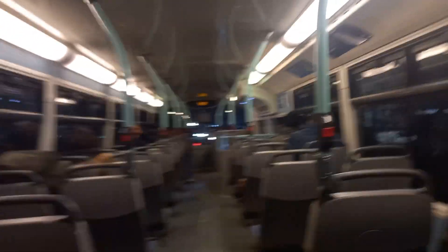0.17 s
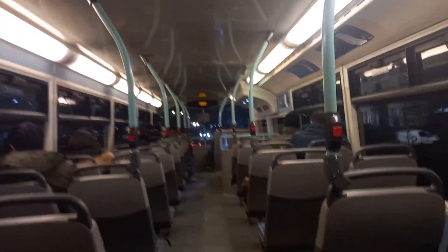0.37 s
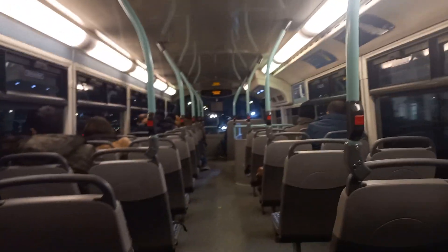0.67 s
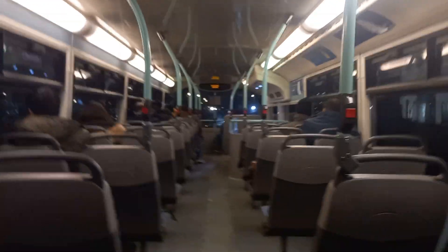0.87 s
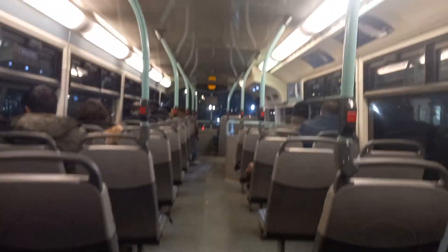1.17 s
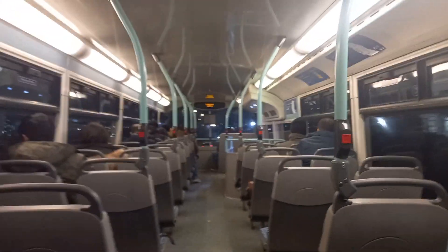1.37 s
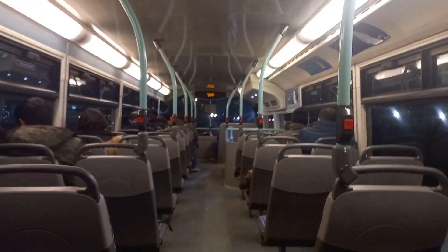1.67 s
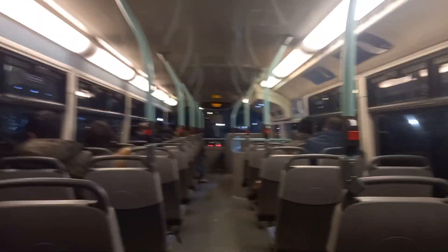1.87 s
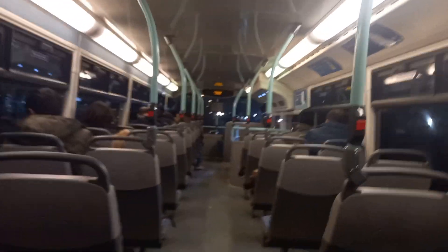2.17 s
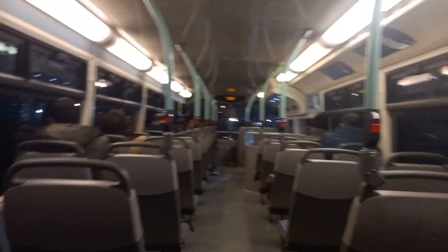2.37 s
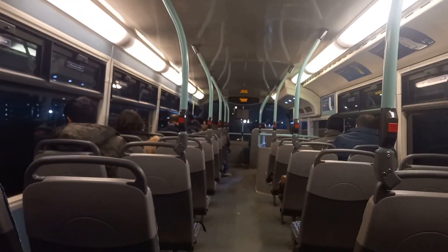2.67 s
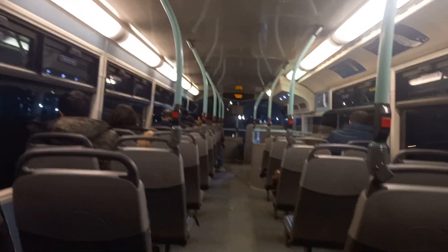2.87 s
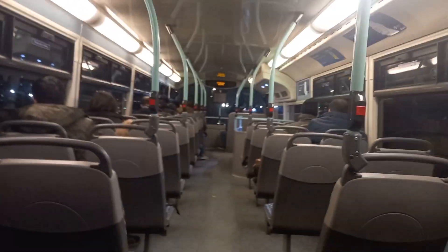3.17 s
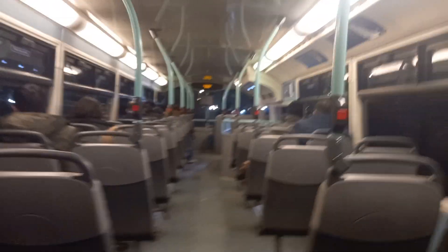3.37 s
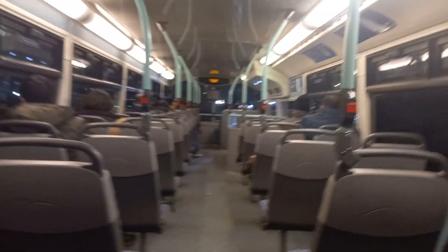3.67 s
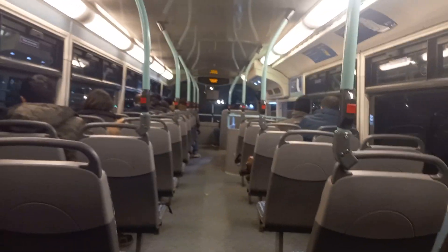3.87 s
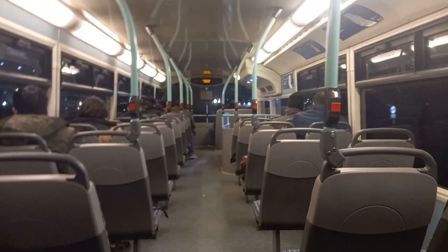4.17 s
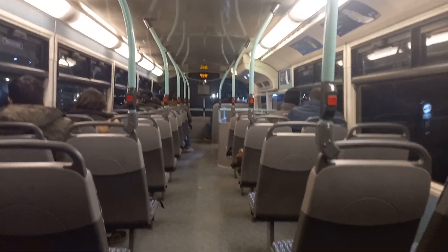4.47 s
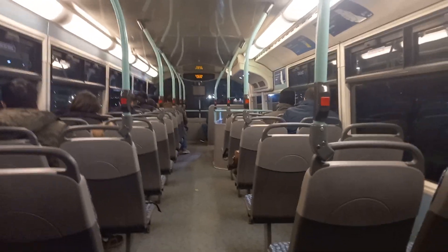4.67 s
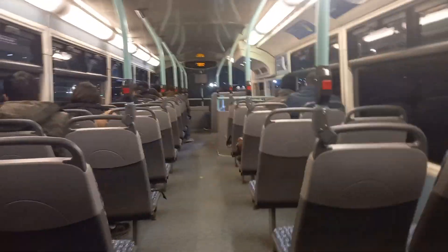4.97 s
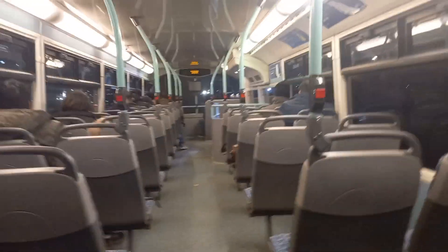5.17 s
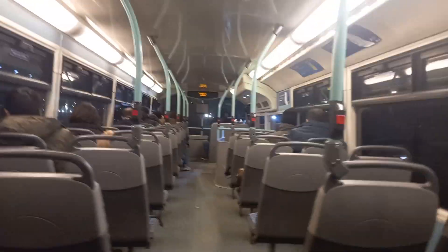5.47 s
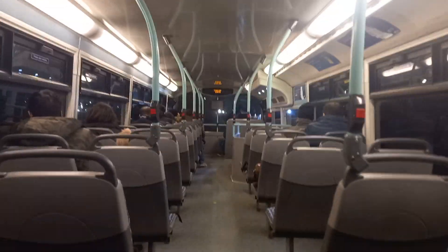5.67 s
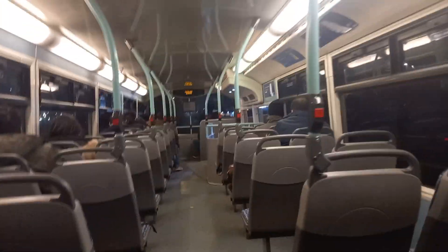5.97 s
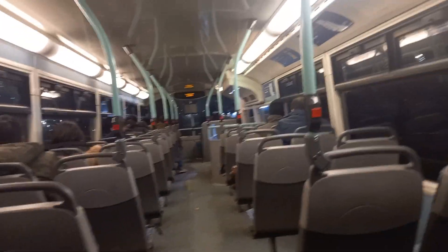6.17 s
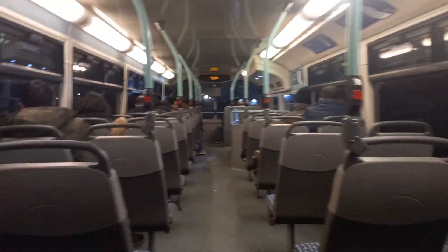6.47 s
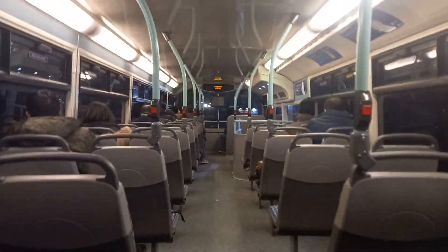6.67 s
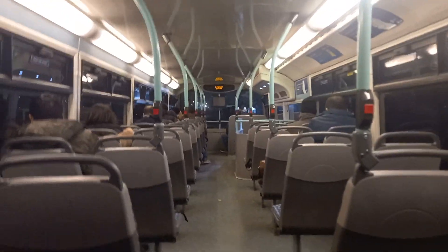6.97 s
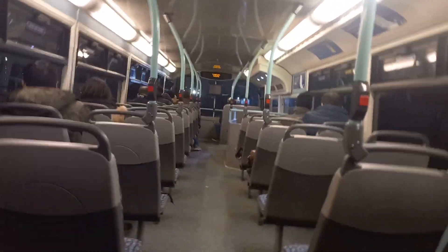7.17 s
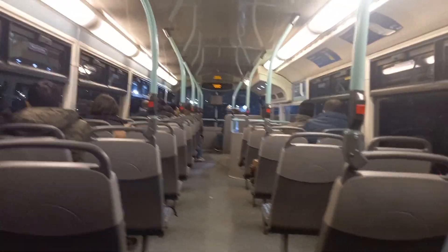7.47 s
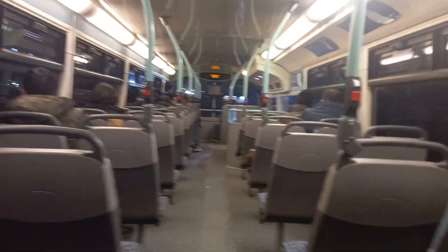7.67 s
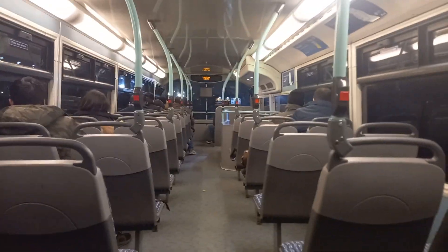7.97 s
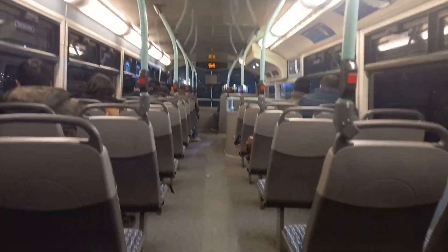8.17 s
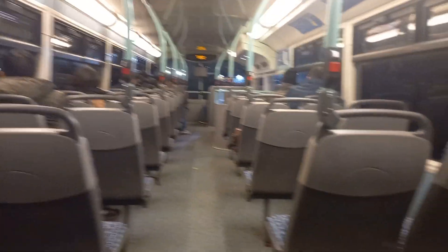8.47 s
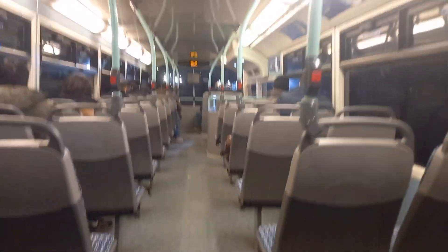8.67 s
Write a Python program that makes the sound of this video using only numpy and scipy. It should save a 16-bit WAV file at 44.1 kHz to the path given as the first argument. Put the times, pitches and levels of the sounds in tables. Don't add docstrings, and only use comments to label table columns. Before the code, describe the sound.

Deep diesel bus engine drone booming through the cabin, easing, shuddering and sagging in pitch, with rattling trim, tyre rumble and soft hiss.

```python
import sys
import numpy as np
from scipy import signal
from scipy.fft import rfft, irfft
from scipy.io import wavfile
from scipy.ndimage import uniform_filter1d

SR = 44100
rng = np.random.default_rng(int(sys.argv[2]) if len(sys.argv) > 2 else 0)


def boost(x):
    u = np.asarray(x, float) / 20
    return 10 ** u


def inscribe(sig):
    pcm = np.round(np.clip(np.atleast_2d(sig).T, -1, 1) * 32767)
    wavfile.write(sys.argv[1], SR, pcm.astype(np.int16))


N = 388080
T = np.arange(N) / SR
T_LOW = T[::10]
PULL_END_S = 3.393

# frequency in Hz, level in dB.
CABIN_BOOM = [(32, -34.5), (60, -15), (85, -5), (105, -17.5), (125, -4), (142, -5.5), (170, -24),
              (212, -5.5), (236, 2.5), (260, 0.5), (290, -20), (335, -5.5), (365, -26), (440, -22)]
# time in seconds, shake level in dB.
ENGINE_EFFORT = [(0, -27), (3.3, -31.5), (3.45, -33), (3.75, -29.5), (4.25, -33), (4.75, -25), (5.0, -20),
                 (5.5, -22), (6.0, -18), (6.75, -21.5), (7.3, -22), (8.0, -24), (8.5, -21.5), (8.8, -18)]
# time in seconds, rumble level in dB.
ROAD_SURFACE = [
    (0, -36.5),
    (2.4, -25.5),
    (3.3, -29),
    (3.75, -30),
    (4.5, -28),
    (5.1, -16.5),
    (6.0, -24),
    (7.2, -29),
    (8.8, -30.5),
]


def curve(table):
    s, *columns = np.transpose(table)
    return [np.interp(T, s, c) for c in columns]


def unit(x):
    return x / np.sqrt(np.mean(x ** 2))


def at_hz(points, f):
    hz, db = np.transpose(points)
    return np.interp(np.log(f + 1e-3), np.log(hz), db)


def colour(x, points, share=1):
    f = np.arange(N // 2 + 1) * SR / N
    return irfft(rfft(x) * boost(share * at_hz(points, f)), N)


def walk(rate, step=1):
    levels = rng.standard_normal(int(N / SR * 200))[:int(N / SR * rate) + 2]
    return 1.2 * np.interp(T[::step], np.arange(len(levels)) / rate, levels)


def line(cycles, db, breath_db, drift, scatter=1):
    level_db = breath_db * walk(7, step=10)
    turn = drift * walk(9, step=10)
    start = scatter * rng.random()
    return np.sqrt(2) * boost(db + level_db) * np.sin(2 * np.pi * (cycles + start + turn))


def drone(turns):
    # time in seconds, drone level in dB, lift of the orders above the loudest in dB.
    pull = [
        (0.0, -12.5, 4.5),
        (0.12, -10.5, 0),
        (0.3, -13.5, -9),
        (0.62, -10.5, -9),
        (1.2, -12, 2),
        (2.0, -12.5, 3.5),
        (2.55, -14, 2.5),
        (3.0, -11.5, 2.5),
        (3.36, -10.5, 3),
    ]
    # multiple of the firing rate, level in dB.
    firing_orders = [(1, -31.5), (2, -19), (3, -12.5), (4, -24.5), (5, -13.5), (6, 1), (7, -19.5),
                     (8, -15.5), (9, -35.5), (10, -51), (11, -34), (12, -26.5), (13, -25.5), (14, -30),
                     (15, -35), (16, -58), (17, -38.5), (18, -42), (19, -32), (20, -41.5), (21, -37),
                     (22, -44), (23, -49.5), (24, -53.5), (25, -40), (26, -53.5), (27, -63), (30, -53),
                     (31, -50), (32, -44.5)]
    smear = .18
    fade_s = .022
    pull_db, bright_db = (c[::10] for c in curve(pull))
    lines = 0
    for k, db in firing_orders:
        lift = (7 < k < 11) + .6 * (k > 13)
        cycles = 2 * k * turns + smear * k ** 2 * (k > 10)
        lines = lines + line(cycles, db + bright_db * lift, breath_db=.4 + .06 * abs(db), drift=.012,
                             scatter=k <= 10)
    for k in range(33, 48):
        lines = lines + line(2 * k * turns, -52 + bright_db, breath_db=4, drift=.05)
    cut = np.exp(-np.clip(T_LOW - PULL_END_S, 0, None) / fade_s)
    return boost(pull_db) * lines * cut


def shake(turns, rate):
    # multiple of the crank rate, level in dB.
    shake_orders = [(2.0, 11), (2.5, -7.5), (3.0, -1.5), (3.5, -9), (4.5, -4), (5.0, -6.5), (5.5, -5.5),
                    (6.5, 2.5), (7.0, 5), (7.5, -1.5), (8.0, -2.5), (8.5, 5.5), (9.0, 4.5), (10.0, -1),
                    (11.0, 2.5), (12.5, -12), (13.5, -5.5), (14.0, -1), (14.5, -8), (15.0, 0), (15.5, -5.5),
                    (16.0, 0.5), (16.5, 0.5), (17.0, 3.5), (17.5, -4.5), (18.0, 0), (18.5, 2), (19.0, 1.5),
                    (19.5, 3), (20.0, -0.5)]
    lead_orders = [4, 6, 11, 12, 13]
    lead_levels = [-7, -16.5, -12, -20, -14.5]
    # start in seconds, end in seconds, level in dB.
    swells = [(3.9, 4.2, -35), (4.8, 6.0, -29), (3.5, 4.6, -26.5), (4.75, 7.8, -24), (5.8, 7.55, -20.5),
              (8.65, 8.9, -16), (4.415, 5.2, -21.5), (5.25, 6.45, -19), (6.5, 7.3, -24.5), (8.65, 7.4, -19),
              (4.55, 5.2, -26), (5.25, 6.45, -20.5), (5.8, 6.45, -24), (6.47, 7.8, -14.5)]
    swell_orders = [4, 4, 6, 6, 6, 6, 11, 11, 11, 11, 12, 12, 13, 13]
    ramp_s = .18
    shake_db = curve(ENGINE_EFFORT)[0][::10]
    free = np.clip((T_LOW - PULL_END_S) / .1, 0, 1)

    def start_scatter(k):
        return .1 if 9 <= k <= 14 else 1

    minor = 0
    for k, db in shake_orders:
        if k in lead_orders:
            continue
        gate = free if k % 2 == 0 else 1
        boom_db = at_hz(CABIN_BOOM, k * rate)
        minor = minor + gate * line(k * turns, db + boom_db, breath_db=2, drift=.025, scatter=start_scatter(k))
    lead = 0
    for k, base_db in zip(lead_orders, lead_levels):
        gain = boost(shake_db + base_db)
        for order, (start, end, db) in zip(swell_orders, swells):
            if order == k:
                inside = np.minimum(T_LOW - start, end - T_LOW)
                gain = gain + boost(db) * np.clip(inside / ramp_s + .5, 0, 1)
        lead = lead + gain * line(k * turns, 0, breath_db=1.5, drift=.015, scatter=start_scatter(k))
    return boost(shake_db) * minor + lead * free


def knocks():
    # first and last knock in seconds, first and last level in dB.
    bouts = [(0.044, 0.187, -26, -34), (0.256, 0.539, -23.5, -33.5), (2.097, 2.257, -29.5, -29.5),
             (2.368, 2.498, -29.5, -23), (2.574, 2.78, -25, -28), (2.851, 3.06, -31.5, -32.5),
             (3.448, 3.588, -24, -23.5), (5.03, 5.174, -21.5, -24), (5.247, 5.317, -20.5, -24),
             (7.562, 7.699, -25, -31), (7.833, 7.978, -27.5, -24.5), (8.043, 8.107, -27, -33.5),
             (8.259, 8.316, -22.5, -35)]
    bout_knocks = [3, 5, 3, 3, 4, 4, 3, 3, 2, 3, 3, 2, 2]
    # time in seconds, level in dB.
    strays = [(0.8, -38.5), (1.525, -39.5), (1.931, -34), (1.999, -30), (3.382, -29.5), (3.796, -33.5),
              (3.937, -40), (5.366, -29.5), (5.502, -33), (5.755, -36), (5.879, -41.5), (7.38, -37),
              (7.485, -28.5), (7.759, -31)]
    rebound_s, rebound_db, rebound_from_db = .032, -14, -28.5
    runs = [np.linspace(row[0::2], row[1::2], n) for row, n in zip(bouts, bout_knocks)]
    first = np.vstack(runs + [strays])
    chance = rng.standard_normal((2 * len(first), 4))
    back = first + [rebound_s, rebound_db] + chance[:len(first), :2] * [.005, 2.5]
    back[:, 1] -= 2 * np.clip(rebound_from_db - first[:, 1], 0, None)
    s, db = np.vstack([first, back]).T
    ring_hz = 2637 - 34 * s + 55 * chance[:, 2]
    fizz_db = -7.5 + 2 * chance[:, 3]
    return np.transpose([s, db, ring_hz, fizz_db])


def rattle(hits):
    # frequency in Hz, level of the fizz in dB per Hz.
    fizz_colour = [(1200, -14), (1800, -2), (2500, -4.5), (3200, -21.5), (4200, -2), (5400, 0),
                   (6500, -8.5), (8000, -2), (9500, -12), (13500, -9.5), (15600, -23)]
    t = T[:int(.2 * SR)]
    ring_shape = np.minimum(t / .0007, 1) * np.exp(-(t / .0048) ** 2)
    tail = np.minimum(t / .0033, 1) * (boost(-60 * t / .31) + .26 * boost(-60 * t / .014))
    rings, fizz, body = np.zeros((3, N + len(t)))
    for s, db, hz, fizz_db in hits:
        i = int(s * SR)
        rings[i:i + len(t)] += boost(db + 2) * np.sin(2 * np.pi * hz * t) * ring_shape
        fizz[i:i + len(t)] += boost(db + fizz_db - 3.5) * tail
        body[i:i + len(t)] += boost(db - 12) * tail
    bounces = rng.standard_normal((2, 2, N)) * boost(.43 * walk(190))
    panel = unit(signal.lfilter(*signal.iirpeak(2480, 6.5, SR), bounces[0]))
    bright = unit(colour(bounces[1], fizz_colour))
    return rings[:N], body[:N] * panel + fizz[:N] * bright


def whistle(table, orders):
    hz, db = curve(table)
    phase = 2 * np.pi * np.cumsum(hz * (1 + .011 * walk(190))) / SR
    return sum(boost(db + d + 3 * walk(30)) * np.sin(k * phase) for k, d in orders)


def turbocharger():
    # time in seconds, whistle pitch in Hz, level in dB.
    spin = [
        (3.6, 4150, -90),
        (3.75, 4300, -64),
        (4.05, 4560, -61),
        (4.3, 4620, -61.5),
        (4.6, 4480, -62),
        (4.95, 4150, -63),
        (5.15, 4000, -90),
    ]
    # multiple of the whistle pitch, level in dB.
    overtones = [(1, 1), (2, 1), (3, 0)]
    # time in seconds, pitch in Hz, level in dB.
    rundown = [
        (5.3, 15600, -90),
        (5.5, 15500, -66),
        (5.8, 14400, -65),
        (6.0, 13100, -64),
        (6.25, 11700, -67),
        (6.5, 10900, -90),
    ]
    return whistle(spin, overtones) + whistle(rundown, [(1, 0), (.76, -4)])


def rush():
    # time in seconds, centre of the band in Hz, level in dB.
    air = [
        (3.5, 12080, -74),
        (3.8, 12030, -57),
        (4.3, 12720, -55),
        (4.9, 11870, -53),
        (5.2, 12300, -82),
    ]
    hz, db = curve(air)
    slow = uniform_filter1d(rng.standard_normal((2, N)), size=16)
    return boost(db) * unit(slow) * np.sin(2 * np.pi * np.cumsum(hz) / SR)


def hiss_levels(hits):
    # time in seconds, change in dB (below zero in a
    # lull), length in seconds.
    jolts_and_lulls = [(0.0, 5.5, 0.1), (0.554, -4.5, .2), (1.444, -2, 0.23), (3.234, 2.5, 0.15), (4.35, -1.5, 0.2),
                       (4.97, 5.5, .08), (5.227, 2, 0.086), (5.745, 2, 0.35), (6.72, -5.5, .06), (7.902, -2, 0.97),
                       (8.217, -6.5, 0.038), (8.8, 2, 0.17)]
    buzz_db, buzz_s = -26, .069
    (road_db,), (effort_db,) = curve(ROAD_SURFACE), curve(ENGINE_EFFORT)
    drive = .34 * (road_db + 28) + .17 * (effort_db + 25)
    for s, db, length in jolts_and_lulls:
        drive = drive + db * np.exp(-((T - s) / length) ** 2)
    t = T[::100]
    buzz = sum(boost(db + buzz_db) * (t > s) * np.exp(-np.abs(t - s) / buzz_s) for s, db, *_ in hits)
    top = boost(-48.5 + .6 * drive) + np.interp(T, t, buzz)
    return -33.5 + drive, 20 * np.log10(top)


def hiss(turns, hits):
    # frequency in Hz, level in dB per Hz.
    hiss_colour = [(300, -7.5), (420, 0.5), (560, -3), (680, -6.5), (850, -9.5), (1200, -16), (2300, -20),
                   (3000, -28.5), (5200, -35), (6500, -40), (8000, -36.5), (10000, -46), (13000, -59.5),
                   (15600, -63)]
    low_db, high_db = hiss_levels(hits)
    f = np.arange(N // 2 + 1) * SR / N
    spectrum = rfft(rng.standard_normal((2, N))) * boost(at_hz(hiss_colour, f))
    spectrum = spectrum / np.std(irfft(spectrum[0], N))
    out = 0
    for band in np.arange(7):
        window = np.clip(1 - np.abs(np.log2(f / 400 + 1e-9) / .9 - band), 0, 1)
        share = np.clip((band - 1) / 3, 0, 1)
        band_db = (1 - share) * (low_db - 1) + share * (high_db + 18.5)
        out = out + boost(band_db + 1.2 * walk(12)) * irfft(spectrum * window, N)
    return out * (1 + .15 * np.cos(4 * np.pi * turns) + .2 * np.cos(8 * np.pi * turns))


def hums():
    mesh_hz = [394, 576]
    mesh_db = [-37, -42]
    mesh_share = [0.59, 0.89]
    # time in seconds, pitch in Hz, level in dB.
    floor_boom = [
        (8.0, 257.7, -25.5),
        (8.064, 246.6, -23.5),
        (8.228, 248.0, -12.5),
        (8.444, 248, -21),
        (8.562, 258.7, -15),
        (8.668, 246.8, -12.5),
        (8.8, 239, -13),
    ]
    load = uniform_filter1d(curve(ENGINE_EFFORT)[0][::10], size=4000) + 20
    mesh = 0
    for hz, db, share in zip(mesh_hz, mesh_db, mesh_share):
        mesh = mesh + line(hz * T_LOW, db + share * load, breath_db=3, drift=.15)
    boom_hz, boom_db = curve(floor_boom)
    fade = np.clip((T_LOW - floor_boom[0][0]) / .1, 0, 1)
    cycles = np.cumsum(boom_hz)[::10] / SR
    return mesh + fade * line(cycles, boom_db[::10] - .5, breath_db=2.5, drift=.015)


def road():
    passed = [(15, -75.0)] + list(CABIN_BOOM) + [(700, -54.5)]
    rumble = unit(colour(rng.standard_normal((2, N)), passed))
    patches_db = 2.2 * walk(2.8)
    return boost(curve(ROAD_SURFACE)[0] + patches_db) * rumble


def cabin_stereo(tones, noise):
    # frequency in Hz, side level minus mid level in dB.
    side_colour = [(60, -12), (110, -13.5), (200, -16), (380, -7), (700, 1), (1290, 3.5), (2380, -1.5),
                   (4400, 0.5), (8120, 0.5), (15000, 0.5)]
    t = T[:int(.1 * SR)]
    high_pass = signal.butter(2, 450, "high", fs=SR)
    echoes = signal.lfilter(*high_pass, rng.standard_normal(len(t))) * boost(-60 * t / .15)
    blur = signal.fftconvolve(tones, echoes / np.linalg.norm(echoes))[:N]
    spread = .85 * signal.hilbert(tones).imag + .5 * blur
    mid, side = tones + noise[0], colour(spread + noise[1], side_colour)
    return np.array([mid + side, mid - side])


def scene():
    # time in seconds, crank turns per second.
    crank = [(0.0, 21.86), (0.8, 21.47), (1.1, 21.21), (2.0, 21.03), (2.2, 21.15), (2.4, 21.04),
             (3.6, 21.03), (4.45, 21.46), (4.8, 21.26), (5.6, 21.04), (6.4, 20.5), (7.2, 19.69),
             (7.68, 19.1), (8.0, 17.34), (8.2, 16.53), (8.42, 16.5), (8.62, 21.8), (8.8, 22)]
    rate, = curve(crank)
    turns = np.cumsum(rate) / SR
    hits = knocks()
    rings, fizz = rattle(hits)
    bass = drone(turns[::10]) + shake(turns[::10], rate[::10]) + hums()
    tones = signal.resample_poly(bass, 10, 1) + rings + turbocharger()
    noise = road() + hiss(turns, hits) + rush() + fizz
    return cabin_stereo(tones, noise)


def top_cut(x):
    return signal.sosfilt(signal.butter(12, 15750, fs=SR, output="sos"), x)


def record(dry):
    # frequency in Hz, left level minus right level in dB.
    port_balance = [(60, 1.5), (110, 0.0), (200, 0.0), (380, -0.5), (700, -1.0), (1290, -1.0), (2380, 1.5),
                    (4400, -0.5), (8120, -4.5), (15000, -6.5)]
    left = colour(dry[0], port_balance, share=.54)
    right = colour(dry[1], port_balance, share=-.57)
    wet = np.array([left, right])
    return top_cut(wet / (1 + wet ** 6) ** (1 / 6))


dry = scene()
out = record(dry)
inscribe(out)
```